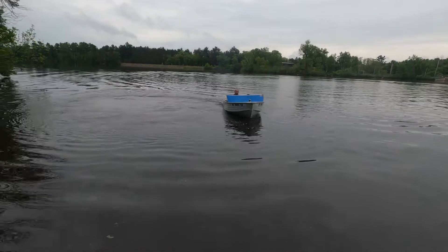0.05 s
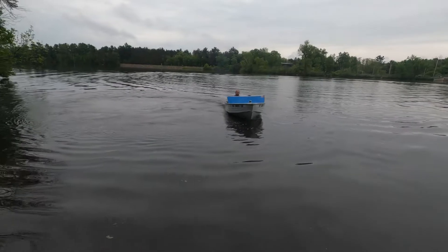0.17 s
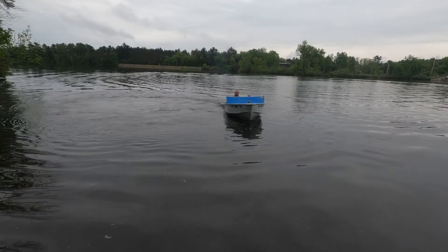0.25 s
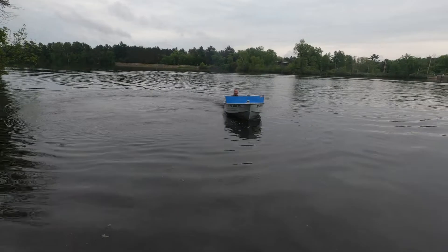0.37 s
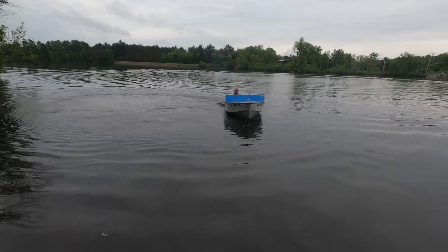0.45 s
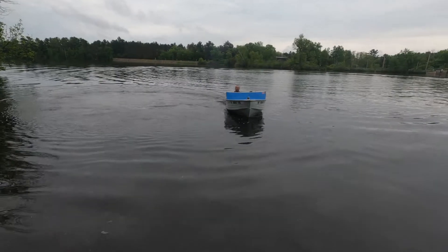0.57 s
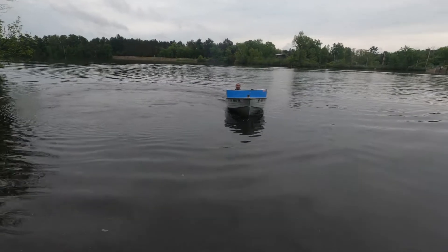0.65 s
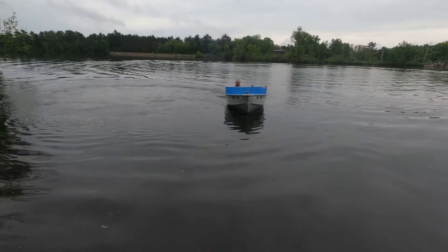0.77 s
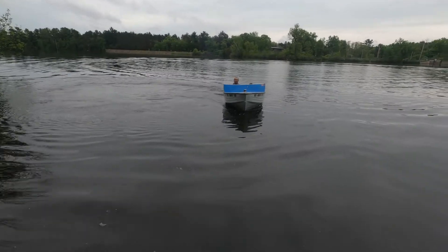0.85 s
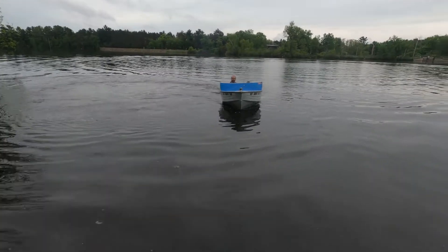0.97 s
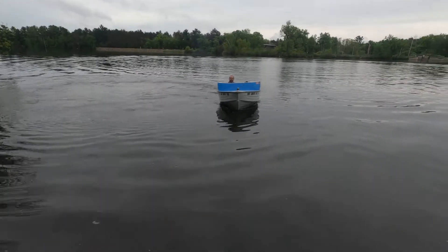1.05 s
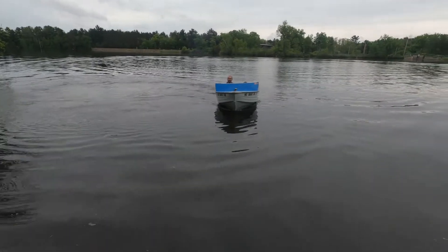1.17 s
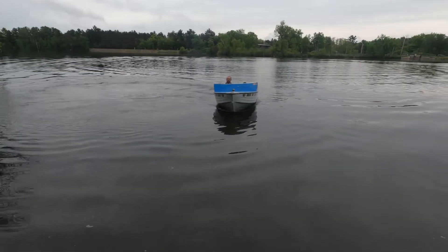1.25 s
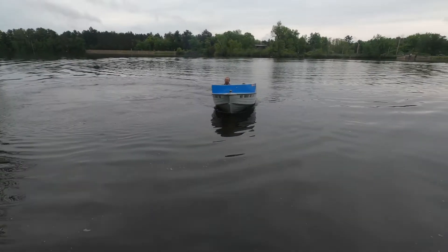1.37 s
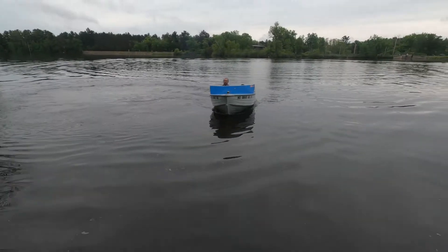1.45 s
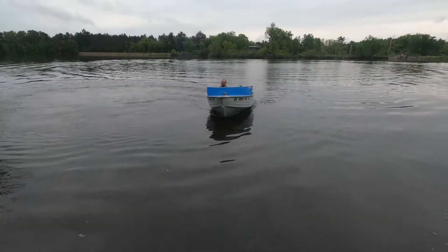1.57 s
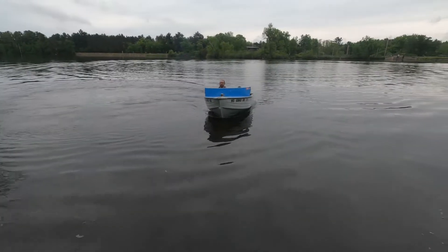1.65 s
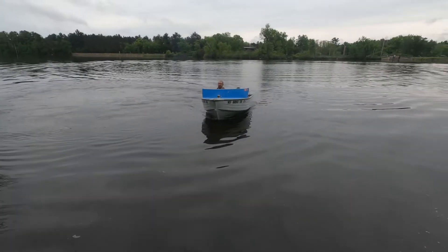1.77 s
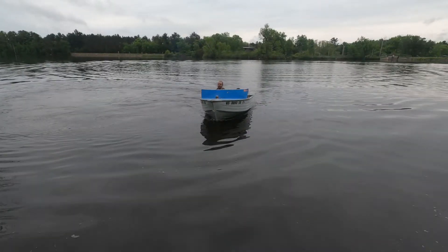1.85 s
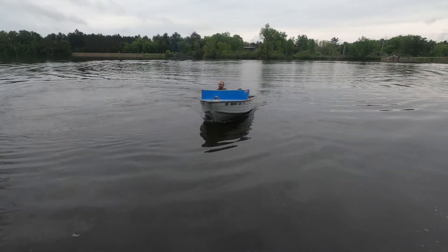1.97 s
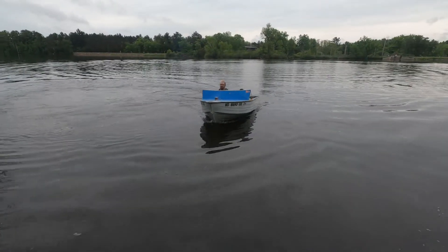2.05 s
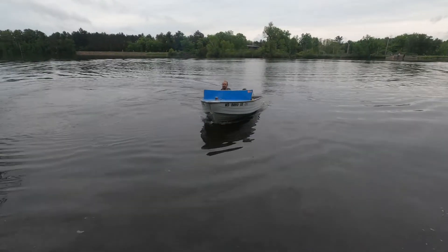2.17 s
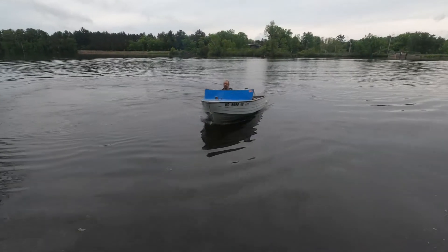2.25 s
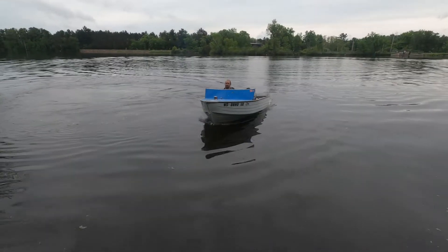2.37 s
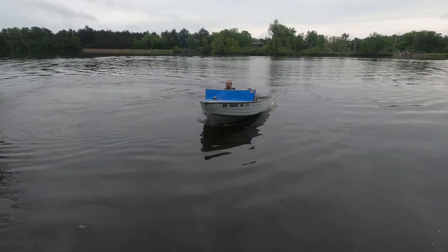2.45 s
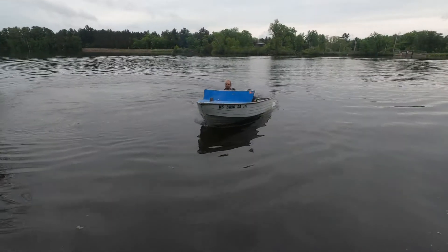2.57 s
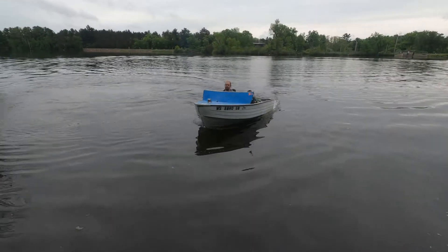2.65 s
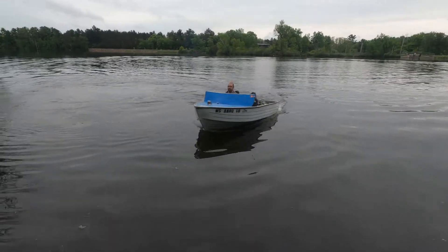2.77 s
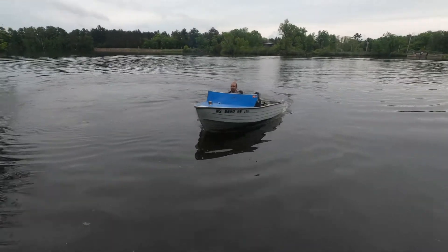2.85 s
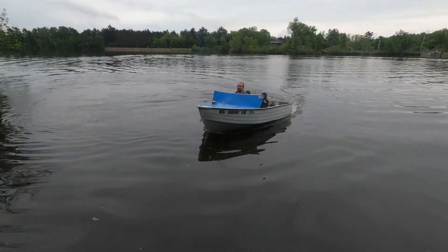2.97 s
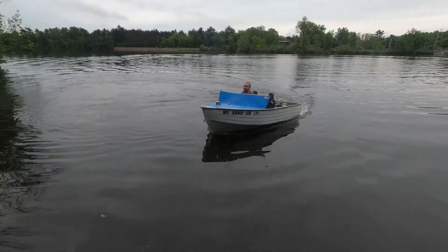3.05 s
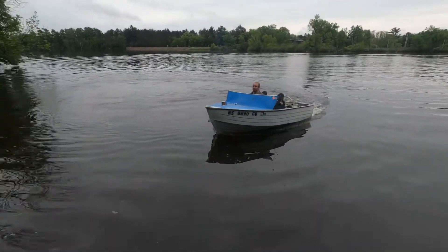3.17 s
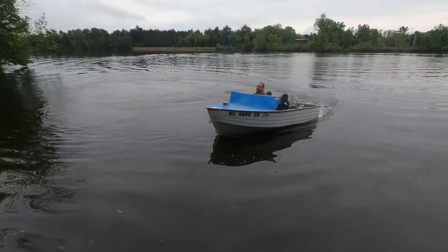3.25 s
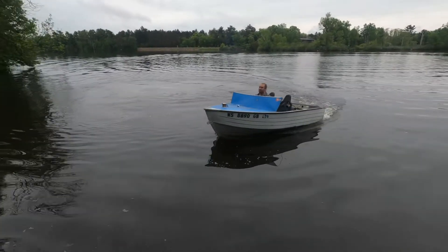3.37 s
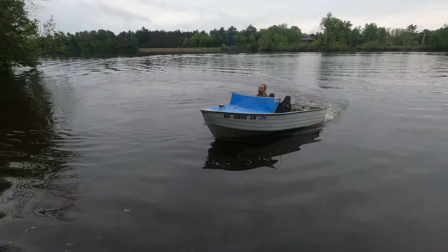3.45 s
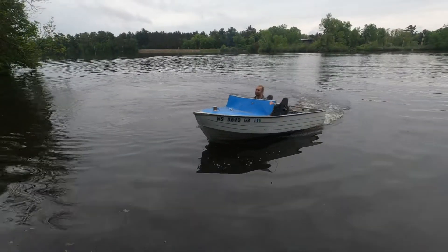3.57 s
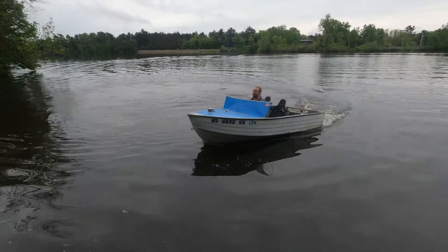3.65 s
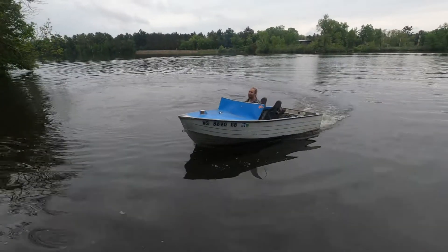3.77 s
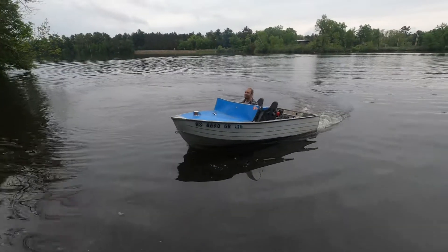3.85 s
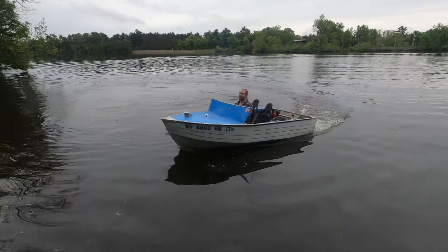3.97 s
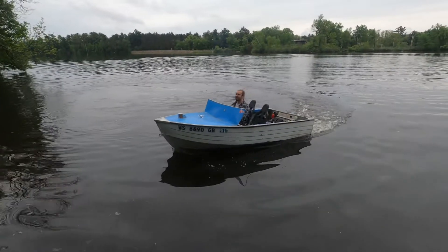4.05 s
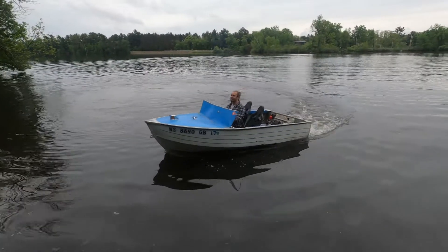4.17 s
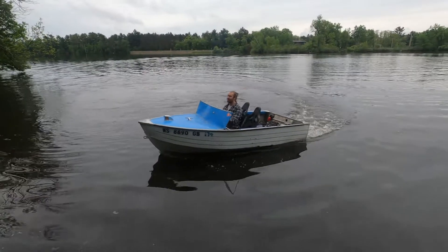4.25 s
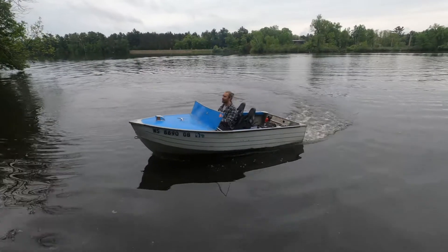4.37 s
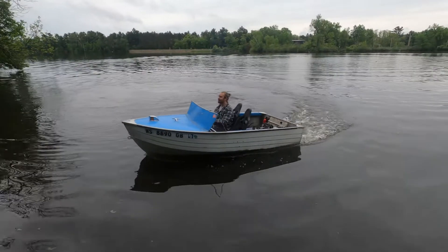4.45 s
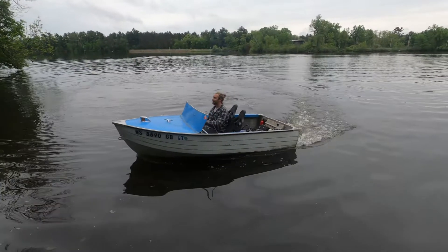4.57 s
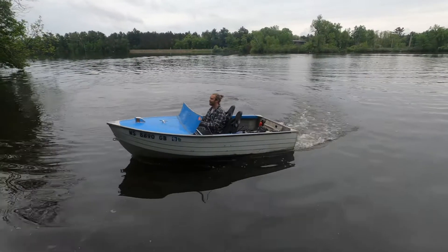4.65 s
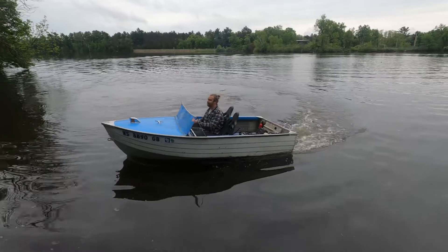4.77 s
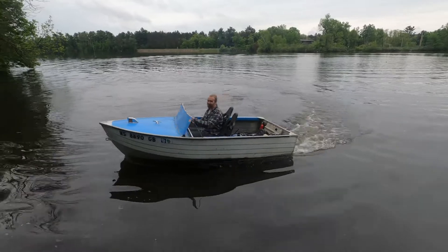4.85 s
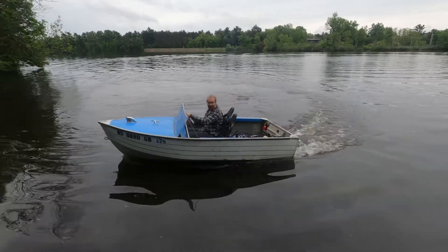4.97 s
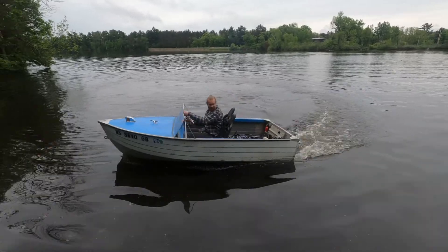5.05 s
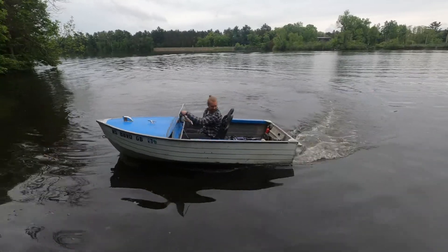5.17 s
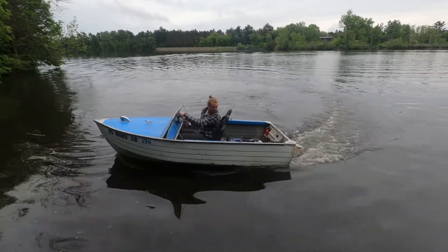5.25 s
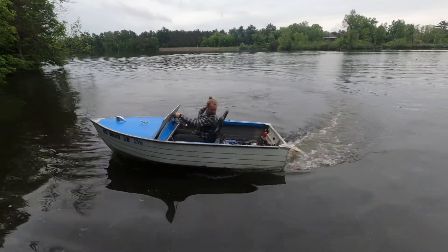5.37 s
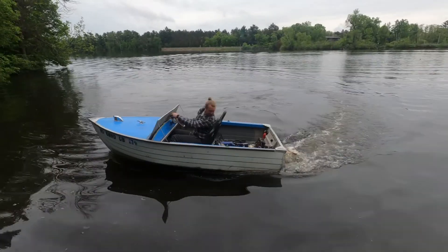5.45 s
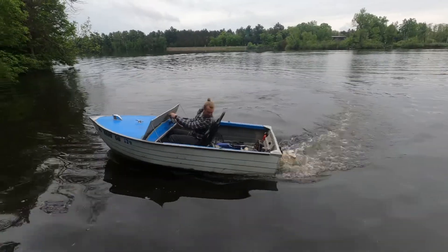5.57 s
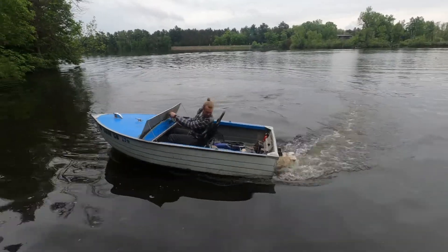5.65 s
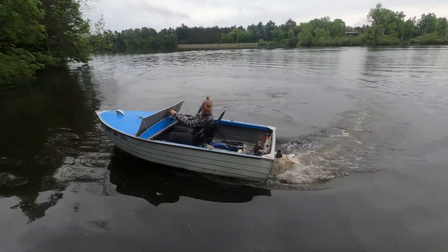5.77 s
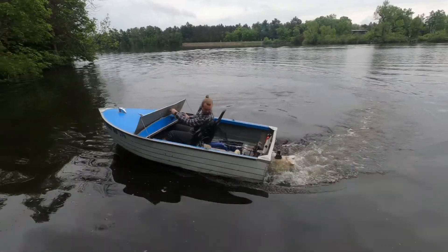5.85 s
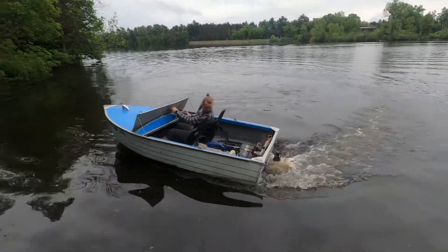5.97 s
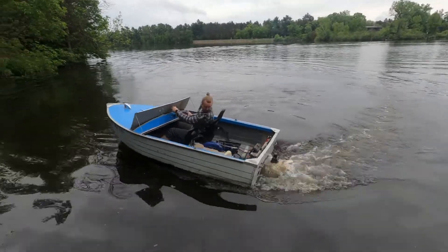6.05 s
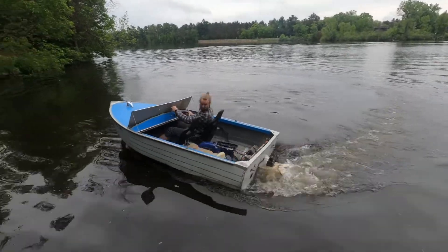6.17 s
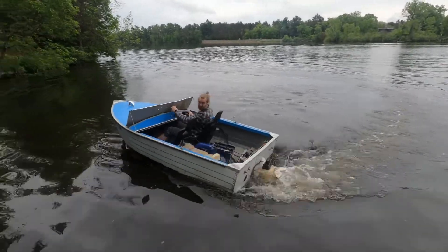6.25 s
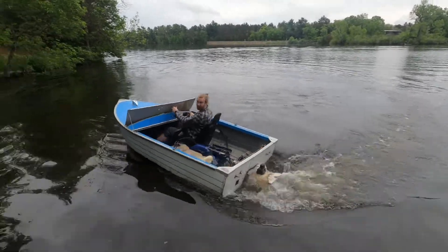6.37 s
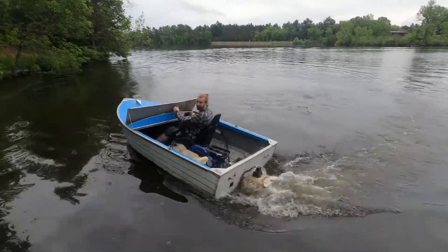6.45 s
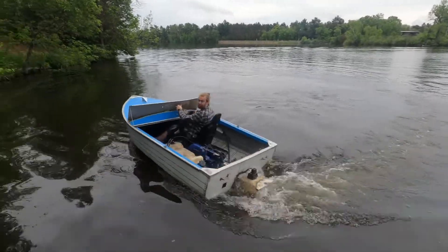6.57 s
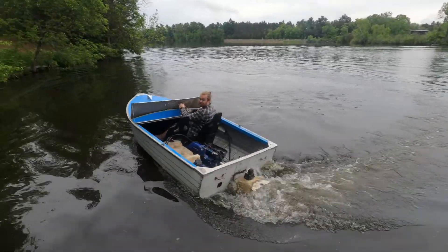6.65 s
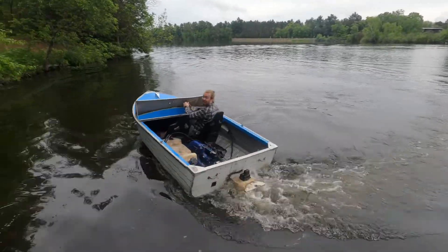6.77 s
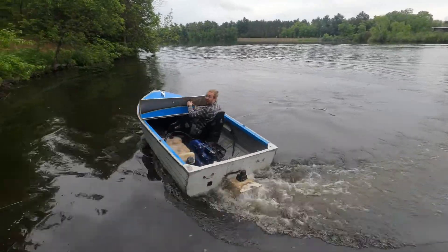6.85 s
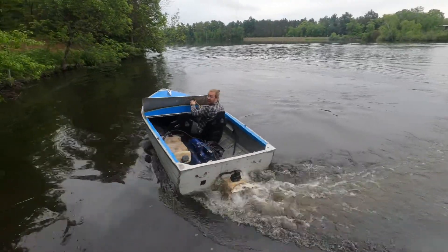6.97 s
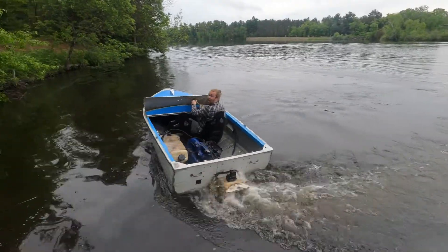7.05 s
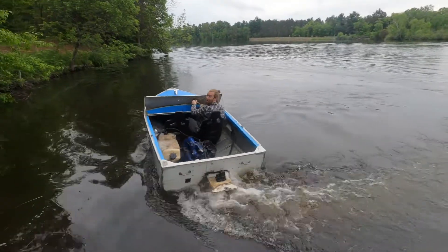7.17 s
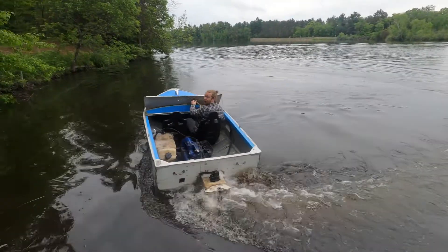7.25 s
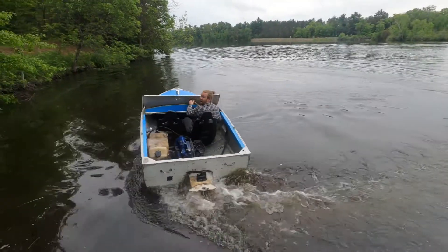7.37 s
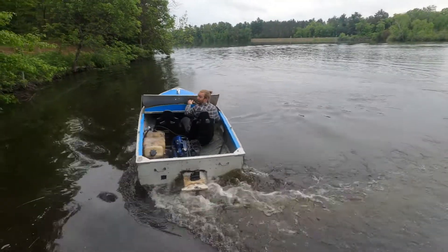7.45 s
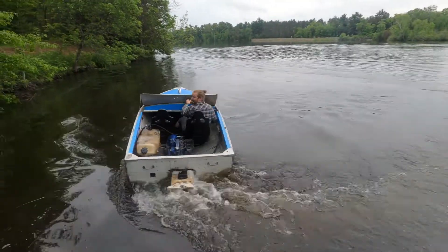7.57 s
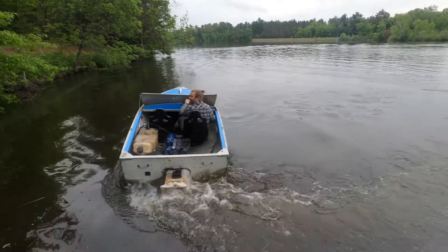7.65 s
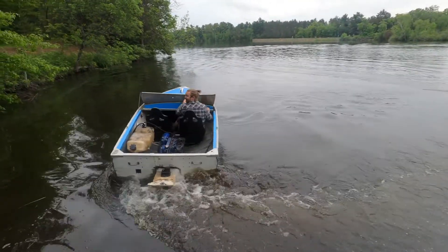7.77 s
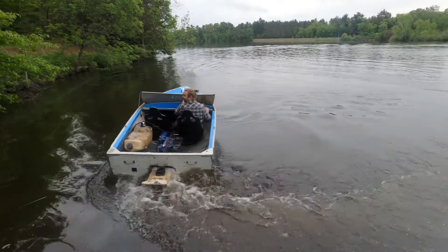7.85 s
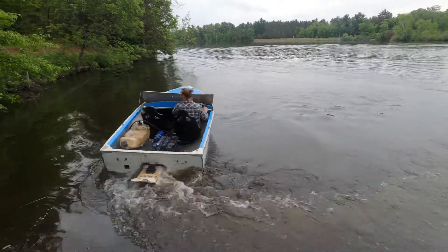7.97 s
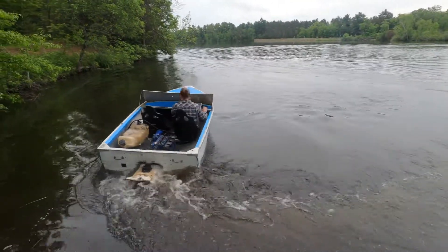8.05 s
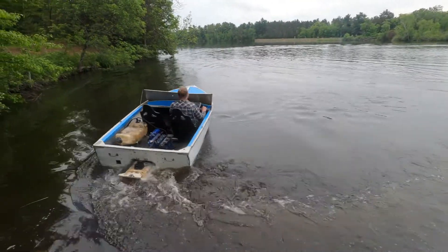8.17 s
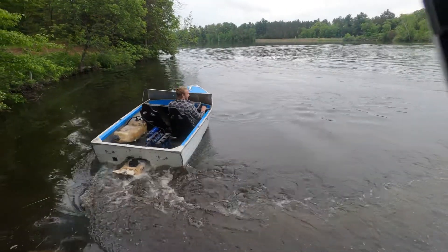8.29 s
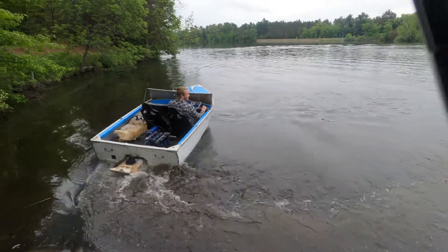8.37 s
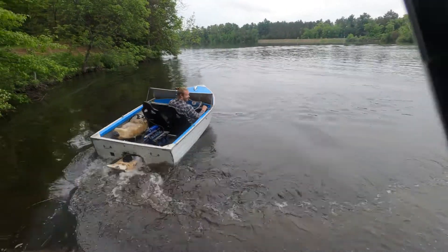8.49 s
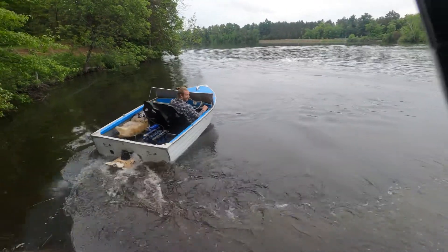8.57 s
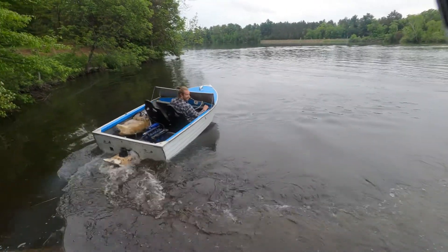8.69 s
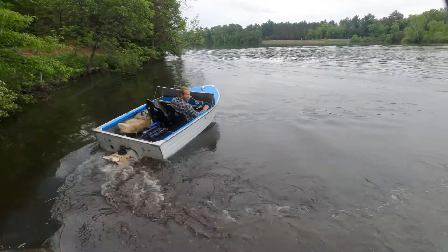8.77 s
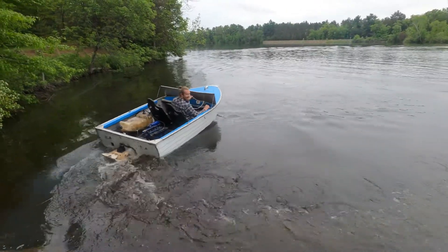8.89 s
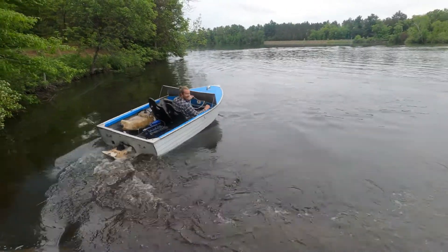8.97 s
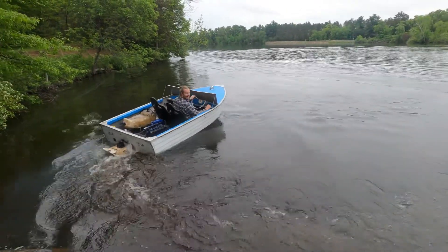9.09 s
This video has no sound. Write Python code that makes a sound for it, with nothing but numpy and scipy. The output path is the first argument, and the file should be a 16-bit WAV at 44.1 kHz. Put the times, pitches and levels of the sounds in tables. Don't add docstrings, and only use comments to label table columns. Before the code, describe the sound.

A small two-stroke boat engine putters unevenly with misfires and metallic ringing, then grows fuller and wetter over churning water as the boat turns away.

```python
import sys
import numpy as np
from scipy import signal
from scipy.fft import rfft, irfft, next_fast_len
from scipy.io import wavfile
from scipy.ndimage import uniform_filter1d

SR = 44100
rng = np.random.default_rng(int(sys.argv[2]) if len(sys.argv) > 2 else 0)


def makeup_ratio(level_db):
    decades = np.asarray(level_db, float) / 20
    return 10 ** decades


def waveform_to_disk(signal):
    frames = np.transpose(np.atleast_2d(signal))
    scaled = np.clip(frames, -1, 1) * 32767
    samples = np.round(scaled).astype(np.int16)
    wavfile.write(sys.argv[1], SR, samples)


N = 402191

LOADED_S = 3.3

# (time [s], speed [turns/s])
SHAFT_SPEED = [(0, 34.67), (.12, 31.56), (1.24, 29.61), (1.66, 45.09), (2.08, 35.2), (2.3, 33.5),
               (2.43, 41.5), (2.68, 35.6), (2.9, 35.4), (3.03, 32.15), (4.41, 28.35), (5.06, 26.69),
               (5.26, 28.7), (6.59, 29.12), (7.05, 30.48), (8.27, 31.03), (8.85, 34.3), (9.13, 34.5)]
# (start [s], rise [s], hold [s], fall [s], extra speed [turns/s])
THROTTLE_BLIPS = [
    (8.34, .17, .2, .08, 6.8),
    (9, .2, .2, .1, 10.8),
]


def shaft_speed():
    t = np.arange(N) / SR
    speed = curves(SHAFT_SPEED)[0]
    for start, rise, hold, fall, extra in THROTTLE_BLIPS:
        speed = speed + np.interp(t - start, np.cumsum([0, rise, hold, fall]), [0, extra, extra, 0])
    return speed


# (time [s], timing scatter [ms])
ROUGHNESS = [(0, .3), (.3, .6), (1.3, .5), (1.5, .2), (1.8, .3), (2.2, .5), (2.4, .12), (3, .3), (4.2, .12),
             (7, .04), (9.12, .04)]


def burns(spells, times):
    start, share = np.transpose(spells)
    start = start - .013
    spell = np.searchsorted(start, times) - 1
    turns = np.arange(len(times)) - np.searchsorted(times, start)[spell]
    share = share[spell]
    stir = np.interp(times, *np.transpose(ROUGHNESS)) * rng.standard_normal(len(times))
    stir = stir * (share < 1) * (times < LOADED_S)
    before = (1 - share) / 2 + share * turns + .5 * np.roll(stir, 1)
    after = (1 - share) / 2 + share * (turns + 1) + .5 * stir
    return np.clip(np.floor(after + 1e-6) - np.floor(before + 1e-6), 0, 1)


# (start [s], share of turns that burn [0-1])
FIRST_CYLINDER = [(0, 1), (.11, .55), (1, .85), (1.46, .35), (2.0, .5), (2.45, .85), (2.92, .6), (3.33, .5),
                  (3.56, .33), (3.85, .5), (4.02, .75), (4.41, .5), (4.51, 1), (4.58, .5), (4.76, 1),
                  (4.84, .5), (5.02, .5), (5.76, .5), (5.87, 1), (5.97, .5), (6.14, 1), (6.28, .5),
                  (6.52, .5), (6.89, 1), (6.96, .5), (7.51, 1), (7.74, .5), (8.04, 1), (8.62, .5),
                  (8.83, 1)]
SECOND_CYLINDER = [(0, 1), (.12, .35), (1.12, .85), (1.47, .1), (1.61, .55), (1.96, 1), (2.16, .4),
                   (2.33, 1), (2.96, .72), (3.36, 1), (3.64, .5), (3.8, .3), (3.93, .75), (4.1, .5),
                   (4.19, 1), (4.78, .78), (5.13, 1), (5.56, .7), (5.7, 1), (7.59, .5), (7.68, 1),
                   (7.89, .97)]
THIRD_CYLINDER = [(0, 1), (.15, .55), (1.36, .62), (2.33, 1), (2.45, 0), (2.53, 1), (2.65, .65), (2.9, .15),
                  (3.3, 0), (3.58, 1), (3.61, 0), (3.77, 1), (3.8, 0)]
# (time [s], peak level [dB])
HARD_CRACKS = [(1.9664, -30.5), (2.344, -19), (2.4828, -18.5), (2.5574, -21.5), (2.613, -12.5),
               (2.668, -11), (3.231, -6.5), (3.585, -7), (3.889, -24.5), (4.195, -27), (5.6214, -21),
               (5.8707, -25), (6.1436, -28), (6.3829, -20), (6.4548, -19), (6.627, -26.5), (6.692, -20),
               (6.761, -15), (6.8245, -14.5), (6.9318, -17.5), (6.97, -20), (7.061, -20), (7.719, -26),
               (7.91, -20.5), (8.452, -16), (8.6465, -20), (8.681, -23), (8.731, -21.5), (8.836, -17.5),
               (8.8759, -26)]


def firings():
    turn = -3.7 + np.cumsum(shaft_speed()) / SR
    slot = np.arange(np.ceil(3 * turn[0]), 3 * turn[-1]).astype(int)
    times = np.interp(slot / 3, turn, np.arange(N) / SR)
    cylinder = slot % 3
    burn = np.zeros(len(slot))
    for which, spells in enumerate([FIRST_CYLINDER, SECOND_CYLINDER, THIRD_CYLINDER]):
        burn[cylinder == which] = burns(spells, times[cylinder == which])
    burn[(cylinder == 0) & (burn == 0) & (times > 7.07) & (times < 7.5)] = .6

    purged = 1 - np.roll(burn, 3)
    scatter = rng.standard_normal((len(slot), 3))
    strength = (.08 + burn * makeup_ratio(1 * purged)) * makeup_ratio(.7 * scatter[:, 0])
    sharpness = (.1 + burn * makeup_ratio(6.5 * purged)) * makeup_ratio(2 * scatter[:, 1])

    at, peak_db = np.transpose(HARD_CRACKS)
    hard = np.abs(times - at[:, None]).argmin(1)
    above_spit_db = peak_db - spit_level()[(at * SR).astype(int)] - 13.5
    sharpness[hard] = makeup_ratio(14.0 + 0.83 * above_spit_db)
    jitter_ms = np.interp(times, *np.transpose(ROUGHNESS)) * scatter[:, 2]
    return times + 1e-3 * jitter_ms, strength, sharpness


def engine(times, strength, sharpness):
    pulses = unit(train(times - .0012, strength))
    rush = blast(times, np.sqrt(strength * sharpness), rise=0.00021, fall=0.0051) + 0.087
    gas = unit(rush * rng.standard_normal(N))
    body = exhaust_thump(pulses, gas) + hull_ring(pulses, gas) + cockpit_bark(pulses, gas)
    return body + outlet_spit(times, sharpness)


# (time [s], exhaust level [dB], thrust [dB], heading [0 bow-on to 1 stern-on])
BOAT = [(0, -13, -12.5, 0.061), (.25, -14.5, -17, 0.039), (.9, -16, -15.5, 0.11), (1.3, -16.5, -12, 0.068),
        (1.55, -17.5, 0, 0.0058), (2.05, -17.5, -6, .08), (2.28, -15, -6, .1), (2.5, -12.5, 0.5, 0.025),
        (3, -14.5, -4, 0.028), (3.6, -13, -2.5, 0.15), (4.2, -13, -3.5, 0.21), (5, -14, -3, .45),
        (5.8, -12, 0.5, 0.64), (6.7, -12, 3, 0.81), (7.25, -11, -0.5, 0.99), (8.2, -11, 0.5, 0.97),
        (8.55, -13, 3, .8), (9.12, -14.5, 2.5, 0.86)]


def layer(base_db, thrust_share, stern_gain_db, bend):
    _, thrust_db, heading = curves(BOAT)
    return base_db + thrust_share * thrust_db + stern_gain_db * np.abs(heading) ** bend


def exhaust_heat():
    heading = curves(BOAT)[2]
    return np.clip((shaft_speed() - 31.5) / (11 - 9.5 * np.clip(heading, 0, 1)), 0, 1)


# (frequency [Hz], width [Hz], level [dB])
COOL_PIPE = [(152.8, 70, -13.5), (198.5, 17.4, 0.5), (254, 127, -13.5)]
HOT_PIPE = [(161.6, 67, -6), (223.6, 78, 1.5)]


def exhaust_thump(pulses, gas):
    def muffled(f):
        return modes([(205, 240, 0)])(f) / (1 + (f / 335) ** 8)

    beat = filtered(pulses + .15 * gas, muffled)
    heat = exhaust_heat()
    cool = unit(filtered(beat, modes(COOL_PIPE)))
    hot = unit(filtered(beat, modes(HOT_PIPE)))
    return makeup_ratio(curves(BOAT)[0]) * steady((1 - heat) * cool + heat * hot)


# (frequency [Hz], width [Hz], level [dB])
HULL_PLATES = [(393, 15.3, 0), (470.4, 17.8, -2.5)]


def hull_ring(pulses, gas):
    ring = filtered(pulses + .24 * gas, lambda f: modes(HULL_PLATES)(f) * modes([(435, 160, 0)])(f))
    return makeup_ratio(layer(-34.5, 0.1, 15, bend=2.2) - 4.4 * exhaust_heat()) * steady(ring)


# (frequency [Hz], width [Hz], level [dB])
BOW_BARK = [(640, 120, 7), (765, 60, 7.5), (1063, 92, -5), (1472, 60, -1)]
SIDE_BARK = [(656.4, 30, 2.5), (743, 72, 0), (903, 59.4, 3.5), (1162, 140, -11.5)]


def cockpit_bark(pulses, gas):
    _, thrust_db, heading = curves(BOAT)
    level_db = layer(-26.5, .5, 2.5, bend=0.4) - 0.8 * np.clip(thrust_db + 2.5, 0, None)
    side = np.clip(np.sin(np.pi * np.abs(heading) ** 0.96) + 0.38 * heading, 0, 1)

    def mid_band(f):
        return (f / 620) ** 8 / (1 + (f / 620) ** 8) / (1 + (f / 2000) ** 4)

    push = filtered(pulses + .34 * gas, mid_band)
    bow_on = unit(filtered(push, modes(BOW_BARK)))
    side_on = unit(filtered(push, modes(SIDE_BARK)))
    return makeup_ratio(level_db) * steady((1 - side) * bow_on + side * side_on)


def spit_level():
    return layer(-29.5, 1.55, 1, bend=7.2)


# (frequency [Hz], level [dB per Hz])
SPIT_COLOUR = [(800, -20.5), (1500, 2), (2200, -6), (4200, -9.5), (5000, -20), (11000, -33), (13000, -52),
               (15000, -77.5)]


def outlet_spit(times, sharpness):
    puff = blast(times, sharpness, rise=.0002, fall=.0045)
    snap = blast(times, sharpness, rise=.0001, fall=.0008)
    hiss = unit((puff + .7 * snap) * patchy(depth_db=4))
    late = .003 * rng.exponential(1, (len(times), 2))
    drop_times = (times[:, None] + late).ravel()
    drops = bubbles(drop_times, np.repeat(sharpness, 2), hz=2630, spread=0.29, cycles=16)
    soft_drops = unit(filtered(drops, lambda f: 1 / (1 + (f / 4500) ** 6)))
    spit = unit(filtered(hiss, colour(SPIT_COLOUR))) + 0.47 * soft_drops
    return makeup_ratio(spit_level() - 3.0) * steady(spit)


# (frequency [Hz], level [dB per Hz])
WASH_COLOUR = [(80, -37.5), (140, -5), (300, -11.5), (550, -5.5), (900, -4.5), (3300, -19.5), (5000, -29.5),
               (7000, -47)]


def jet_wash():
    draw = rng.random((5000, 2))
    sizes = makeup_ratio(-2 * np.log(draw[:, 1]))
    gurgle = bubbles(draw[:, 0] * N / SR, sizes, hz=2200, spread=.45, cycles=12)
    wash = unit(filtered(patchy(depth_db=5) + 0.29 * unit(gurgle), colour(WASH_COLOUR)))
    return makeup_ratio(layer(-28.5, .5, 5, bend=0.04) - 5.0) * wash


# (frequency [Hz], level [dB per Hz])
FIZZ_COLOUR = [(2500, -34), (4000, -0.5), (6000, -4), (8300, -4), (12000, -14), (13500, -32.5),
               (15000, -70), (15600, -89)]


def fine_spray():
    fizz = unit(filtered(patchy(depth_db=1.5), colour(FIZZ_COLOUR)))
    return makeup_ratio(layer(-58, .3, 15.5, bend=0.33) - 4.0) * fizz


# (frequency [Hz], width [Hz], level [dB])
DRONE_MODES = [(40.5, 16, -7.5), (62.2, 9.9, 0), (120, 110, -8.5)]


def hull_drone(times, strength):
    shaking = .5 * rng.standard_normal(N) + unit(train(times, strength))
    drone = filtered(shaking, lambda f: modes(DRONE_MODES)(f) * modes([(55, 90, 0)])(f))
    damping_db = curves([(LOADED_S - .45, 0), (LOADED_S, 7)])[0]
    return makeup_ratio(layer(-22, .3, -5.5, bend=0.7) - damping_db) * steady(drone)


def bank_echo(boat):
    t = np.arange(SR // 2) / SR
    scatter = signal.lfilter([1], [1, -.8], rng.standard_normal(len(t)))
    bank = scatter * makeup_ratio(-60 * t / 0.33) * (t > .02)
    return makeup_ratio(-15) * signal.fftconvolve(boat, bank / np.linalg.norm(bank))[:N]


def train(times, sizes):
    return np.bincount(np.clip(times * SR, 0, N - 1).astype(int), sizes, N)


def blast(times, sizes, rise, fall):
    t = np.arange(SR // 10) / SR
    shape = (1 - np.exp(-t / rise)) * np.exp(-t / fall)
    return np.abs(signal.fftconvolve(train(times, sizes), shape)[:N])


def bubbles(times, sizes, hz, spread, cycles):
    pitch = np.clip(hz * np.exp(spread * rng.standard_normal((len(times), 1))), 600, 12000)
    t = np.arange(256) / SR
    age = t * pitch / cycles
    tone = sizes[:, None] * np.sin(2 * np.pi * pitch * t) * np.sqrt(age) * np.exp(-3 * age)
    at = (times[:, None] * SR).astype(int) + np.arange(len(t))
    return np.bincount(at.ravel(), tone.ravel(), N + SR)[:N]


def patchy(depth_db):
    z = signal.stft(rng.standard_normal(N + 512), nperseg=256)[2]
    field = uniform_filter1d(rng.standard_normal(z.shape), size=4, axis=0)
    field = uniform_filter1d(field, size=6, axis=1)
    return signal.istft(z * makeup_ratio(depth_db * unit(field)), nperseg=256)[1][:N]


def modes(table):
    def response(f):
        total = 0
        for k, (centre, width, db) in enumerate(table):
            damping = 1j * f * width
            total = total + (-1) ** k * makeup_ratio(db) * damping / (centre * centre - f * f + damping)
        return total
    return response


def colour(points):
    f, db = np.transpose(points)
    return lambda hz: makeup_ratio(np.interp(np.log(hz + 1), np.log(f), db))


def filtered(x, response):
    m = next_fast_len(N + SR // 2)
    return irfft(rfft(x, m) * response(np.fft.rfftfreq(m, 1 / SR)), m)[:N]


def curves(rows):
    s, *cols = np.transpose(rows)
    return [np.interp(np.arange(N) / SR, s, c) for c in cols]


def unit(x):
    return x / np.sqrt(np.mean(x ** 2) + 1e-20)


def steady(x):
    return x / np.sqrt(np.abs(uniform_filter1d(x ** 2, SR // 3)) + 1e-12)


def scene():
    times, strength, sharpness = firings()
    boat = engine(times, strength, sharpness)
    water = jet_wash() + fine_spray() + hull_drone(times, strength)
    return (boat + bank_echo(boat) + water)[None]


def top_cut(x):
    return signal.sosfilt(signal.butter(12, 15480, fs=SR, output="sos"), x)


def record(dry):
    limited = dry / (1 + np.abs(dry / .95) ** 4) ** (1 / 4)
    dull = filtered(limited[0], lambda f: 1 / (1 + (f / 13800) ** 12))[None]
    return top_cut(dull)


dry = scene()
out = record(dry)
waveform_to_disk(out)
```